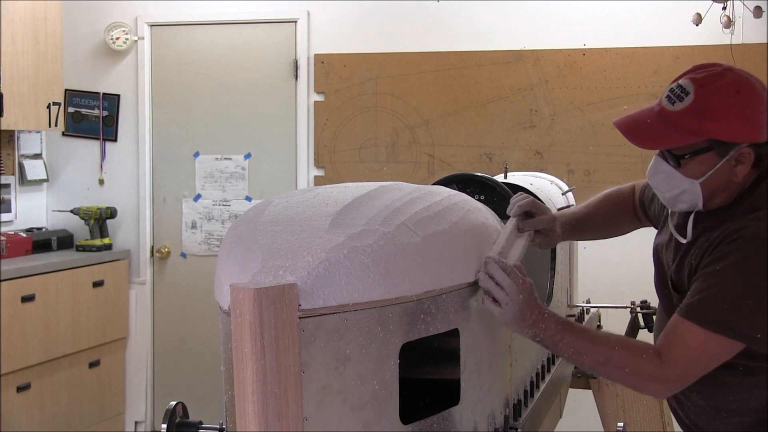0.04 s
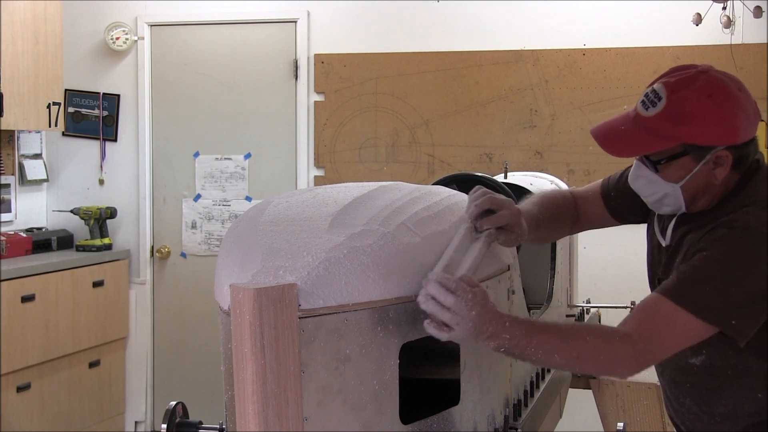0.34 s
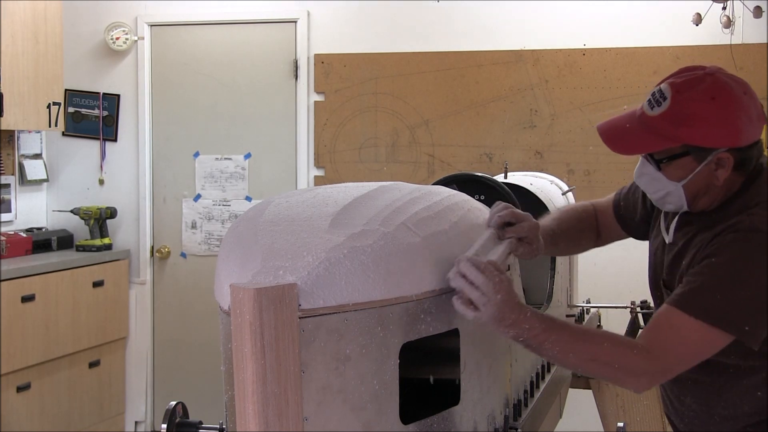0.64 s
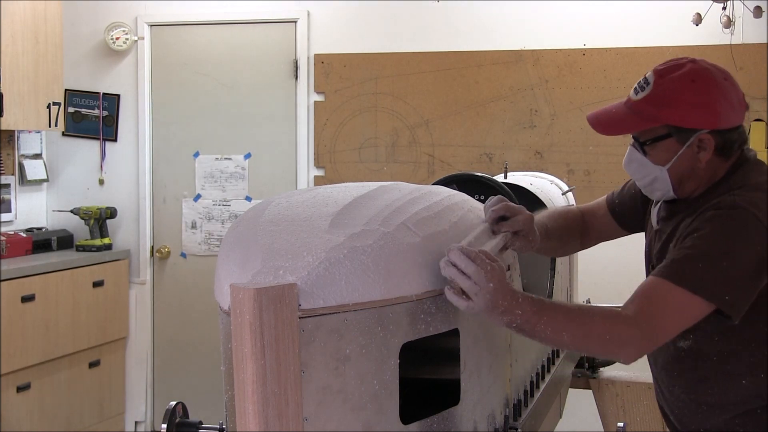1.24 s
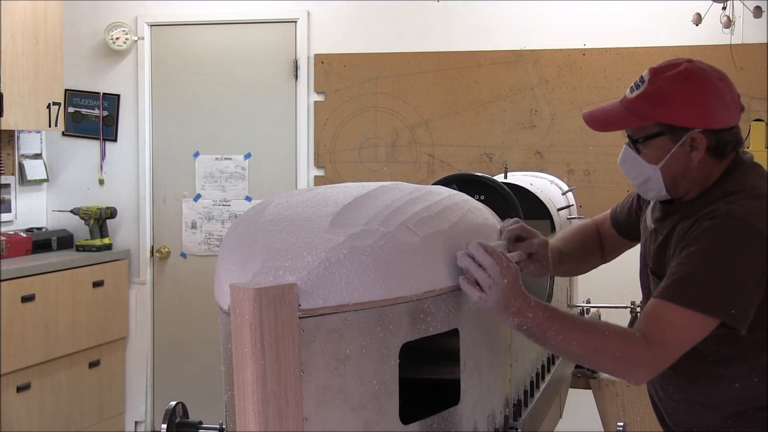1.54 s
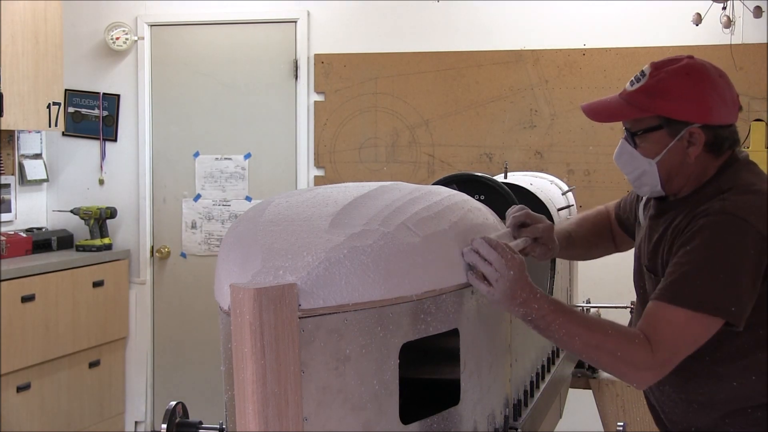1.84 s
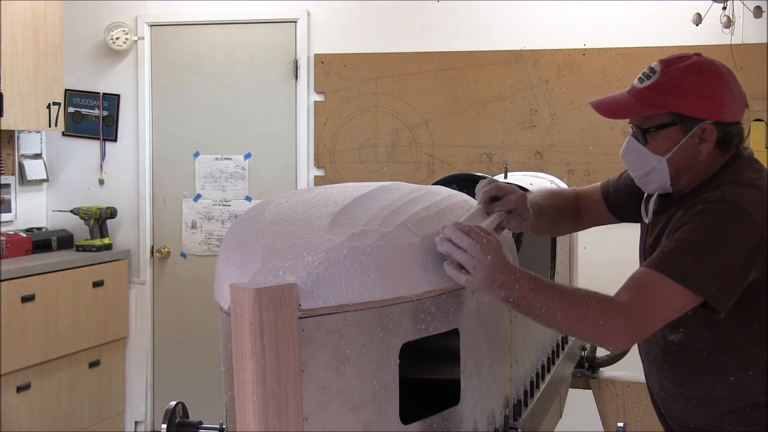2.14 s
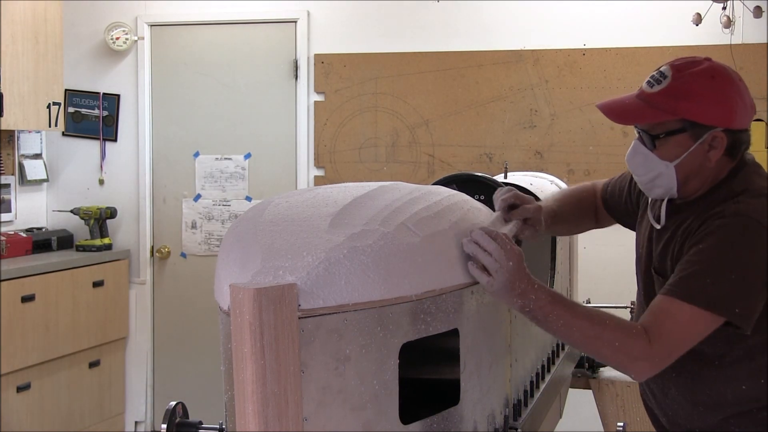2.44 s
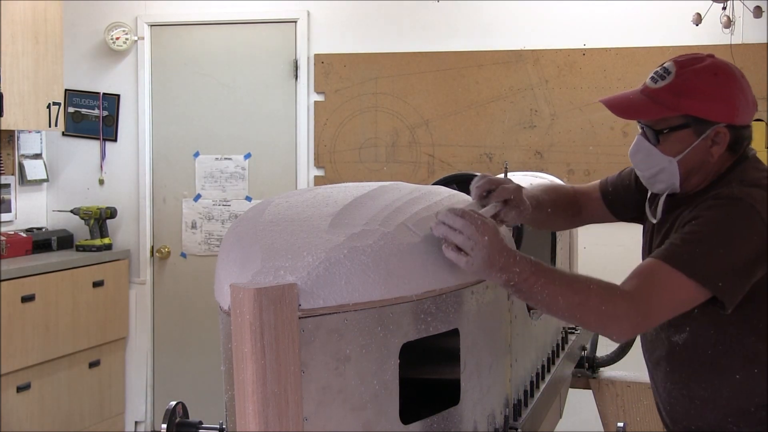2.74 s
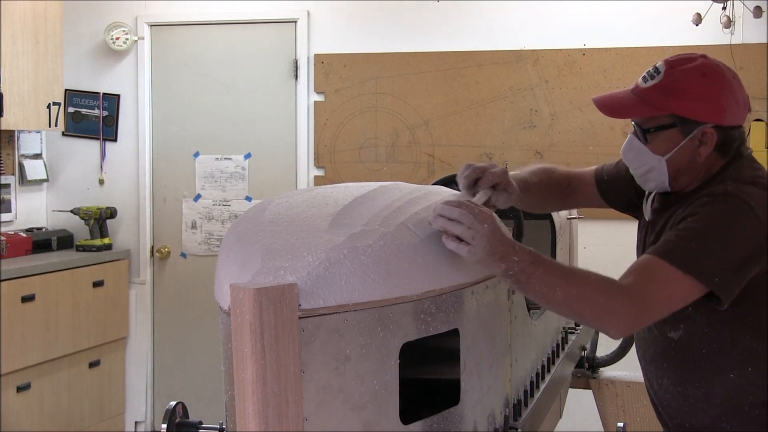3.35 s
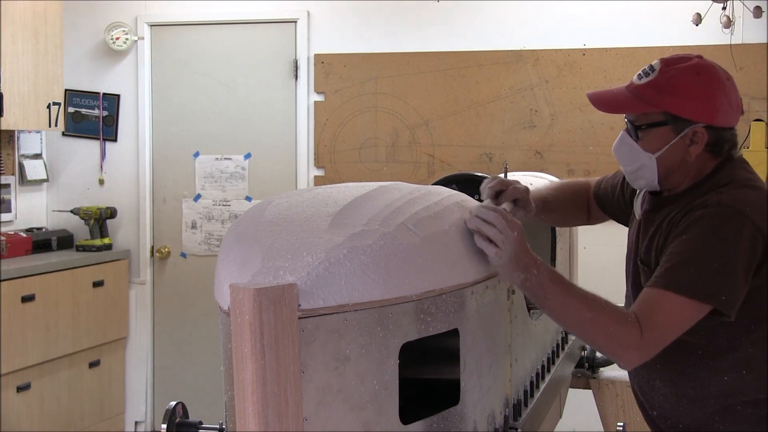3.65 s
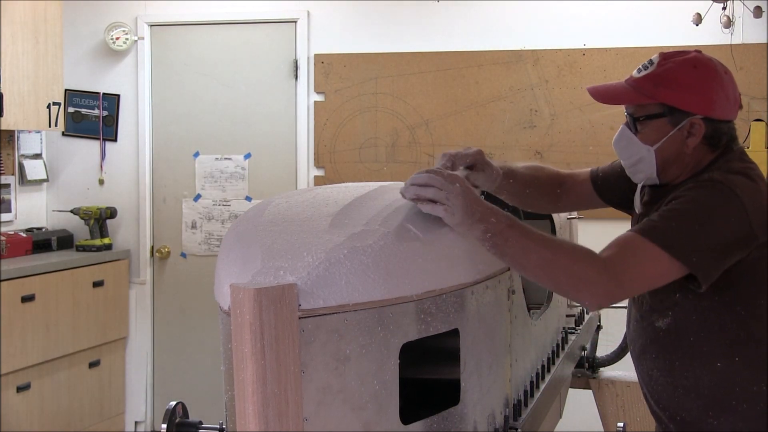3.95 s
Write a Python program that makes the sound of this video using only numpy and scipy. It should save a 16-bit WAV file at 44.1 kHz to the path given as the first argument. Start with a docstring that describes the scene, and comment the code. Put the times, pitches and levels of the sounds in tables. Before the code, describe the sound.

A sanding block rubs back and forth over foam in quick, uneven strokes, hissing and rasping while the hollow shell beneath drums. Two faint, thin squeaks come early. A low hum of air fills the small workshop.

```python
"""A sanding block rubs back and forth over a foam nose on a hollow shell, in a small workshop.
Each stroke hisses with its speed, rasps where the hand presses and makes the shell drum; the grit tears
foam cells in tiny snaps. Twice the block squeaks at a turn, and the last stroke shudders in the bass.
Under it lies a low, steady hum of air."""
import sys
import numpy as np
from scipy import signal
from scipy.fft import rfft, irfft, next_fast_len
from scipy.io import wavfile
from scipy.ndimage import uniform_filter1d, map_coordinates

SR = 44100
rng = np.random.default_rng(int(sys.argv[2]) if len(sys.argv) > 2 else 0)


def unload_wav(signal):
    """Save mono or channel-first audio to the path in sys.argv[1] as 16-bit WAV at rate SR, clipped to [-1, 1]."""
    wavfile.write(
        sys.argv[1],
        SR,
        np.round(np.clip(np.atleast_2d(signal).T, -1, 1) * 32767).astype(np.int16),
    )


N = 176400

# paper gripping within a stroke: t/s, rasp level/dB, block level/dB
GRIPS = [(.83, -22, -5), (.93, -10, -24), (1.17, -5, 1), (2.38, -17.5, -2), (2.69, -5, -5), (3.24, -11, 1),
         (3.57, -5, -20)]
GRIP_SIGMA_S = 0.03


def sanding():
    """Speed and pressure drive hiss, scrape, rasp and the ringing of block and shell."""
    speed, press, (hiss_db, scrape_db, rasp_db, shell_db) = motion()
    catch = wobble(35.12)

    def drive(level_db, power, press_db, rest, catch_db):
        return (rest + speed ** power) * amp(level_db + press_db * (press - 1) + catch_db * catch)

    sliding = drive(hiss_db, power=0.87, press_db=-2.0, rest=0.056, catch_db=-0.3)
    scraping = drive(scrape_db, power=0.98, press_db=1.0, rest=0.22, catch_db=0.73)
    tearing = drive(rasp_db, power=0.46, press_db=5, rest=0.27, catch_db=0.54)
    drumming = drive(shell_db, power=0.41, press_db=5.5, rest=0.11, catch_db=1.0)
    return hiss(sliding) + scrape(scraping) + rasp(tearing) + block(tearing) + shell(drumming)


def motion(last_turn_s=4.014, press_sigma=0.27):
    """Block speed (0-1), hand pressure (0-1) and the four stroke levels/dB, per sample."""
    # start t/s, fastest at/stroke, hardest press at/stroke, level/dB of hiss, scrape, rasp, shell
    strokes = [ (-.2, 0.68, 0.55, -2.5, 2, 2.5, 2.5), (0.12, 0.19, 0.32, 0, 2.5, 0.5, 0.5),
               (0.536, 0.78, 0.84, 0.5, -1, 1, 1), (.993, 0.39, 0.48, 0.5, 1.5, 1.5, 2),
               (1.324, 0.46, 0.64, 0, -2.5, -2.5, -2), (1.555, 0.37, 0.55, -1.5, 0.5, 0, -1),
               (1.758, .5, 0.58, -0.5, -5, -0.5, -2), (1.967, 0.47, 0.44, 1.5, 1, 2, 4),
               (2.233, 0.49, 0.54, -0.5, -2, -0.5, 1.5), (2.483, 0.56, 0.41, 0, 0.5, 0.5, 2.5),
               (2.791, 0.36, 0.56, -2.5, -1, -2, 3), (3.063, 0.56, 0.54, -0.5, 1, 0, 2),
               (3.391, 0.46, 0.65, -4.5, -3, -3.5, 0.5), (3.676, 0.54, 0.36, -1.5, 1, 0, 3.5)]
    t = np.arange(N) / SR
    start_s, fastest, hardest, *levels_db = np.transpose(strokes)
    length_s = np.diff(np.append(start_s, last_turn_s))
    k = np.clip(np.searchsorted(start_s, t) - 1, 0, len(start_s) - 1)
    share = np.clip((t - start_s[k]) / length_s[k], 0, 1)
    speed = np.sin(np.pi / 2 * np.minimum(share / fastest[k], (1 - share) / (1 - fastest[k])))
    press = np.exp(-.5 * ((share - hardest[k]) / press_sigma) ** 2)
    smooth = lambda v: uniform_filter1d(v, size=900)
    return speed, smooth(press), [smooth(db[k]) for db in levels_db]


def grit(per_s, scatter_db, clump_db):
    """Grit tears foam cells: two streams of uneven, clumped snaps at rms 1."""
    hit = rng.random((2, N)) < per_s / SR
    size = np.sign(rng.standard_normal((2, N))) * amp(scatter_db * rng.uniform(-0.92, 1, (2, N)))
    return unit(hit * size * amp(clump_db * wobble(240)))


def hiss(sliding, gain_db=-30):
    """Dense snaps merge into a fine hiss."""
    spectrum = [(500, -13), (2000, -2.5), (4000, 0), (7000, 0), (10000, -2.5), (13000, -6), (15800, -16)]  # f/Hz, level/dB
    return amp(gain_db) * sliding * coloured(grit(14000, 6.9, 0.33), spectrum)


def scrape(scraping, gain_db=-26.5):
    """Sparser snaps make a sharp scrape."""
    spectrum = [(300, -24), (1200, -2.5), (2200, 1), (3500, -1.5), (5500, -5), (8000, -12.5), (12000, -23),
                (16000, -32)]  # f/Hz, level/dB
    return amp(gain_db) * scraping * coloured(grit(8000, 5.9, 0.44), spectrum)


def rasp(tearing, gain_db=-26):
    """Coarse tearing, louder where the paper grips."""
    spectrum = [(25, -70), (80, -42), (135, -19), (190, -6), (300, 3), (550, 0.5), (900, -1), (1700, -6.5),
                (3000, -16), (8000, -29)]  # f/Hz, level/dB
    grip = swells([(s, db) for s, db, _ in GRIPS], GRIP_SIGMA_S)
    return amp(gain_db) * (tearing + grip) * coloured(grit(3000, 5.9, 1.1), spectrum)


def block(tearing, gain_db=-33):
    """Tearing and grips ring the block's modes."""
    modes_hz = [770, 1047, 1212, 1590, 1725, 2367, 2715]  # f/Hz
    modes = [(59.5, 1.5), (97, -2), (30, 2), (109, 2), (60, 2.5), (50, -2.5), (55, -5.5)]  # width/Hz, level/dB
    grip = swells([(s, db) for s, _, db in GRIPS], GRIP_SIGMA_S)
    return amp(gain_db) * ringing((tearing + grip) * grit(3000, 6.7, 1.3), modes_hz, modes)


def shell(drumming, gain_db=-25.5):
    """Snaps drum the hollow shell's modes."""
    modes_hz = [163, 229, 254, 361, 412, 453, 531, 607, 672]  # f/Hz
    modes = [(24, -13), (14.5, 0.5), (23.2, -2.5), (16.2, -10), (19.5, -11.5), (11.9, -12), (20, -8.5),
             (25, -12), (30.6, -12)]  # width/Hz, level/dB
    return amp(gain_db) * ringing(drumming * grit(4000, 6.4, 0.8), modes_hz, modes)


def bites():
    """Short, bright bursts where the grit digs into the foam."""
    bursts = [(.205, -32), (1.078, -22.5), (3.262, -26)]  # t/s, level/dB
    spectrum = [(1500, -19), (4800, 3.5), (7000, -3), (16000, -14)]  # f/Hz, level/dB
    return swells(bursts, sigma_s=0.019) * coloured(grit(12000, 5.3, 0.68), spectrum)


def bumps(judder_hz=240, waver=.07):
    """Over a ridge the block judders near the shell's main modes; mid stream only."""
    ridges = [(.735, -17), (1.70, -19), (2.09, -19), (2.38, -21), (2.965, -18.5), (3.25, -16),
              (3.32, -17.5), (3.575, -20), (3.745, -19.5)]  # t/s, level/dB
    judder = np.sin(2 * np.pi * np.cumsum(judder_hz * (1 + waver * wobble(100))) / SR)
    return np.array([swells(ridges, sigma_s=0.016) * judder, np.zeros(N)])


def shudder(at_s=3.9, level_db=-29):
    """A low rumble swells under the last stroke."""
    spectrum = [(30, -39), (60, -14), (112, 4.5), (138, -8), (170, 3), (300, -45)]  # f/Hz, level/dB
    return swells([(at_s, level_db)], sigma_s=0.16) * coloured(rng.standard_normal((2, N)), spectrum)


def squeaks(attack_s=.008, release_s=0.088, waver=.007, slide=.006, flutter_db=1.8):
    """The slow block sticks and slips: two thin, unsteady tones an octave apart."""
    slips = [(0.504, 0.22, -32, -32.5), (1.008, 0.16, -35, -48)]  # t/s, length/s, upper level/dB, lower level/dB
    upper_hz = [10690, 10790]  # f/Hz
    t, out = np.arange(N) / SR, np.zeros(N)
    flutter = lambda db: amp(db + flutter_db * wobble(109.7))
    for hz, (start_s, length_s, upper_db, lower_db) in zip(upper_hz, slips):
        age_s = t - start_s
        glide = slide * (np.clip(2 * age_s / length_s, 0, 1) - .5)
        phase = 2 * np.pi * np.cumsum(hz * (1 + waver * wobble(500) + glide)) / SR
        envelope = np.clip(age_s / attack_s, 0, 1) * np.clip((length_s - age_s) / release_s, 0, 1)
        out += envelope * (flutter(upper_db) * np.sin(phase) + flutter(lower_db) * np.sin(phase / 2))
    return out


def workshop(x, segments=25, low_cut_hz=300):
    """Direct sound plus a small room's even reverberation, its response drawn afresh per segment."""
    wet, step = np.zeros((2, N + SR)), N // segments
    for i in range(0, N, step):
        part = signal.fftconvolve(x[:, i:i + step], room_response(), axes=1)
        wet[:, i:i + part.shape[1]] += part
    return x + filtered(wet[:, :N], lambda hz: hz / np.hypot(hz, low_cut_hz))


def room_response(tail_db=-9, walls_db=-14, walls_s=.025, echoes_per_s=900):
    """Near-wall echoes and a short tail, two streams."""
    decay = [(150, 0.94), (1000, 0.56), (4000, 0.39), (9000, 0.31), (16000, 0.035)]  # f/Hz, T60/s
    hz, t, noise = signal.stft(rng.standard_normal((2, SR // 2)), SR, nperseg=256)
    tail = signal.istft(noise * amp(-60 * t / along(decay, hz)[:, None]), SR, nperseg=256)[1]
    lag_s = np.arange(tail.shape[1]) / SR
    echoes = rng.standard_normal(tail.shape) * (rng.random(tail.shape) < echoes_per_s / SR)
    walls = echoes * (lag_s > .002) * (lag_s < walls_s)
    norm = lambda v: v / (np.linalg.norm(v, axis=1, keepdims=True) + 1e-9)
    return amp(tail_db) * norm(tail) + amp(walls_db) * norm(walls)


def air(level_db=-45):
    """Low, steady hum of air."""
    spectrum = [(20, -33), (50, -7), (80, 3.5), (113, 15.5), (140, 1), (300, -1), (1000, -15), (16000, -48)]  # f/Hz, level/dB
    return amp(level_db) * coloured(rng.standard_normal((2, N)), spectrum)


def stereo(x):
    """Two streams become mid and side of a narrow image."""
    likeness = [(100, 0.82), (250, 0.97), (1000, 0.87), (5000, 0.76), (8000, 0.87), (12000, 1)]  # f/Hz, left-right correlation
    balance = [(60, 4), (140, -1.5), (450, -1), (1200, 0)]  # f/Hz, left over right/dB
    angle = lambda hz: np.arccos(along(likeness, hz)) / 2
    mid, side = filtered(x, lambda hz: np.array([np.cos(angle(hz)), np.sin(angle(hz))]))
    left_right = np.array([mid + side, mid - side])
    return filtered(left_right, lambda hz: amp(np.outer([.5, -.5], along(balance, hz))))


def amp(db):
    return 10 ** (np.asarray(db) / 20)


def unit(x):
    return x / np.sqrt(np.mean(np.abs(x) ** 2) + 1e-20)


def along(points, hz):
    """Interpolate (f/Hz, value) points on a log axis."""
    f, v = np.transpose(points)
    return np.interp(np.log(hz + 1), np.log(f + 1), v)


def wobble(knots_per_s):
    """Smooth random curve."""
    knots = rng.standard_normal(int(N * knots_per_s / SR) + 4)
    return map_coordinates(knots, [np.arange(N) * knots_per_s / SR])


def swells(rows, sigma_s):
    """One Gaussian per (t/s, level/dB) row."""
    t = np.arange(N) / SR
    return sum(amp(db) * np.exp(-.5 * ((t - s) / sigma_s) ** 2) for s, db in rows)


def filtered(x, response):
    """Apply a complex frequency response."""
    size = next_fast_len(N + SR // 2)
    return irfft(rfft(x, size) * response(np.fft.rfftfreq(size, 1 / SR)), size)[..., :N]


def coloured(x, spectrum):
    """Shape x by a spectrum, to rms 1."""
    return unit(filtered(x, lambda hz: amp(along(spectrum, hz))))


def ringing(x, modes_hz, modes):
    """Resonances of alternating sign; white noise keeps its level."""
    def response(f):
        return unit(sum((-1) ** k * amp(db) * 1j * f * width / (hz * hz - f * f + 1j * f * width)
                        for k, (hz, (width, db)) in enumerate(zip(modes_hz, modes))))
    return filtered(x, response)


def scene():
    """Sanding in the workshop, over the air's hum."""
    hum = air()
    work = sanding() + bites() + bumps() + shudder() + squeaks()
    return stereo(workshop(work) + hum)


def record(dry):
    """Brick-wall low-pass."""
    top_hz = 15820
    return filtered(dry, lambda hz: hz < top_hz)


dry = scene()
out = record(dry)
unload_wav(out)
```